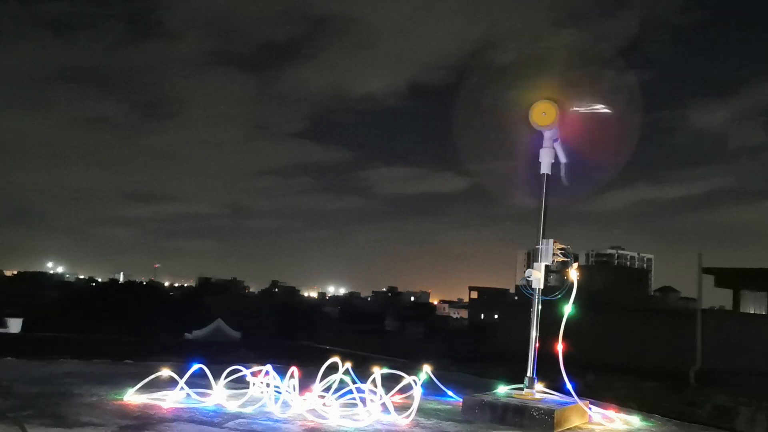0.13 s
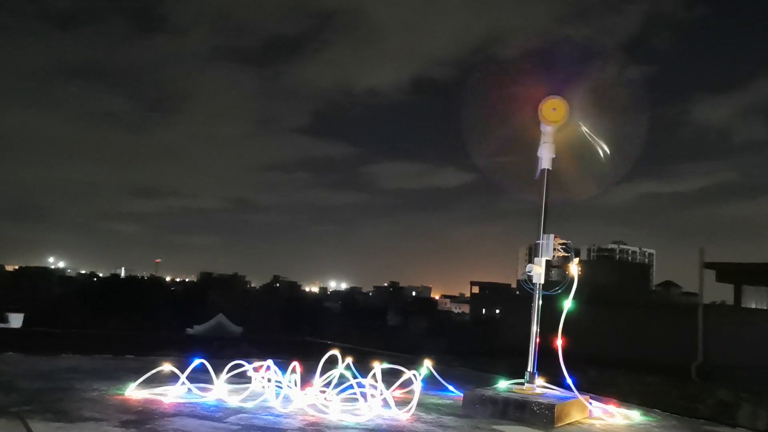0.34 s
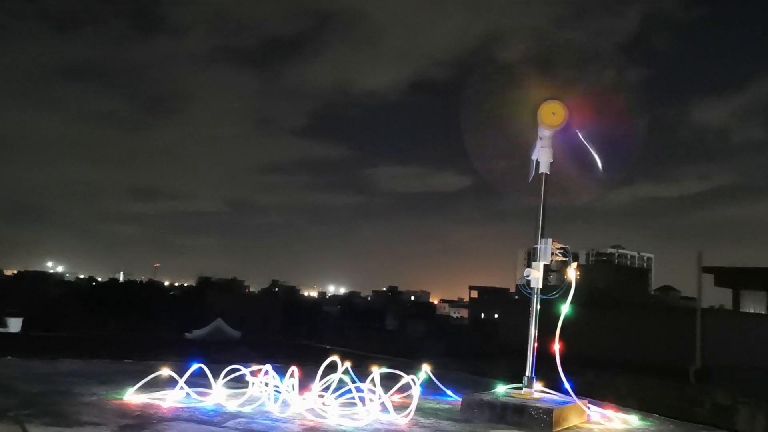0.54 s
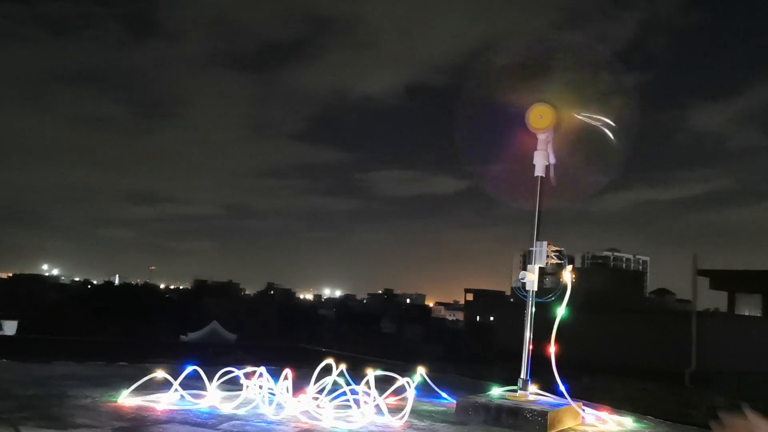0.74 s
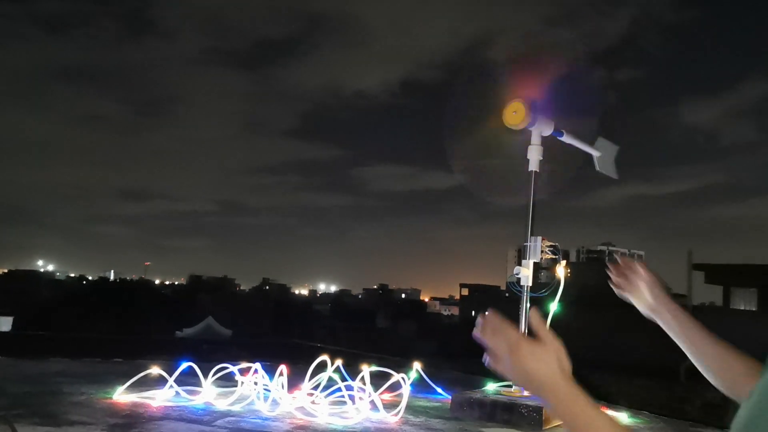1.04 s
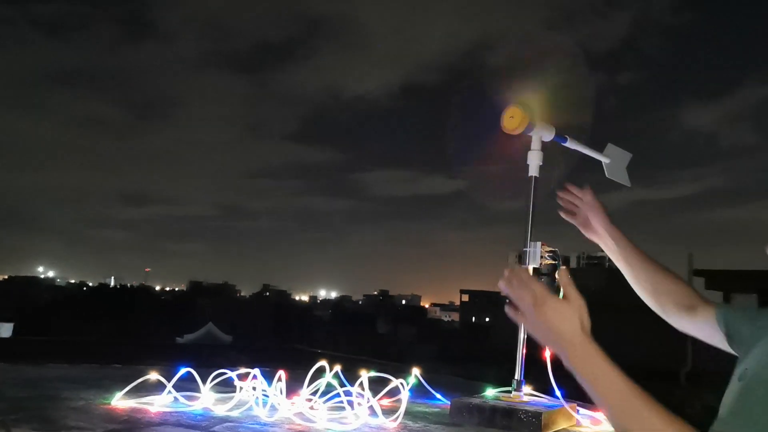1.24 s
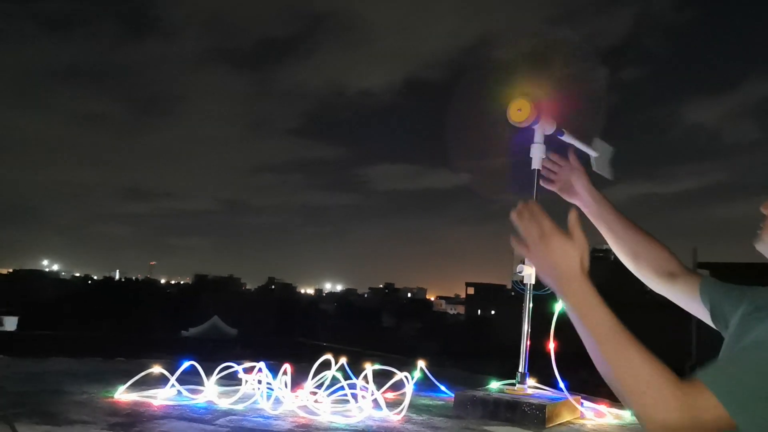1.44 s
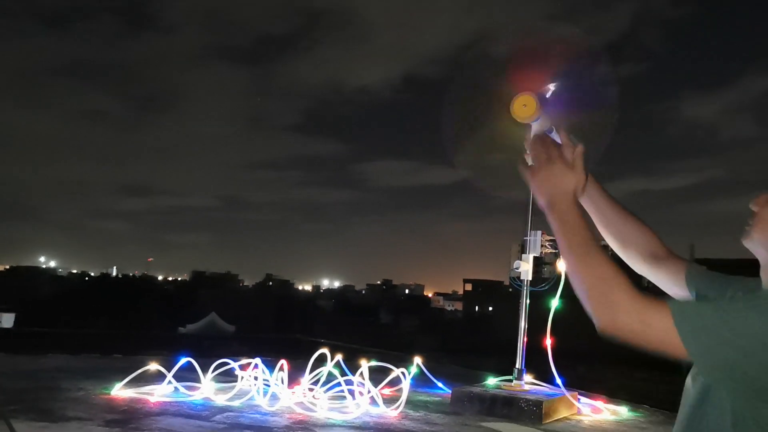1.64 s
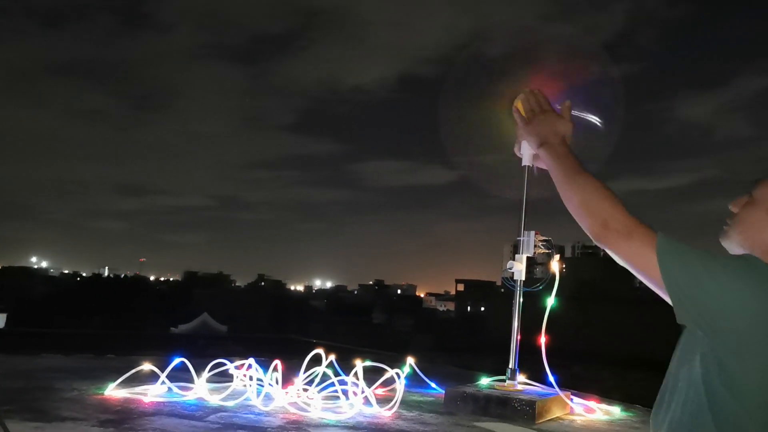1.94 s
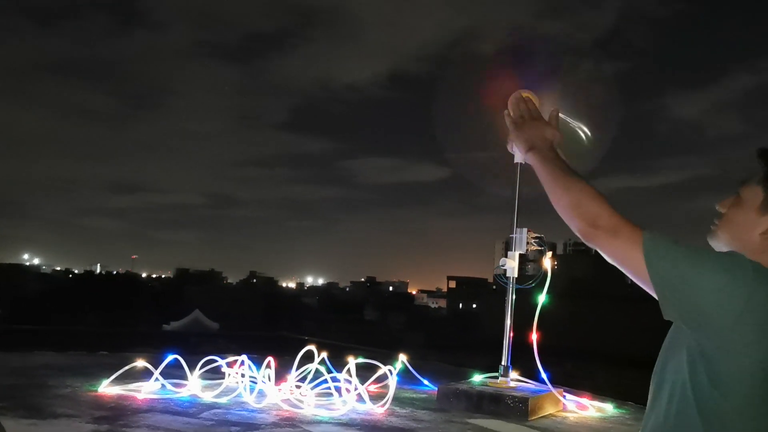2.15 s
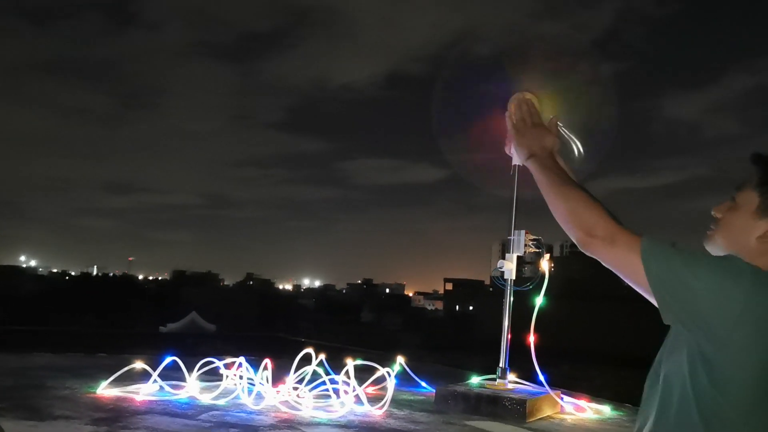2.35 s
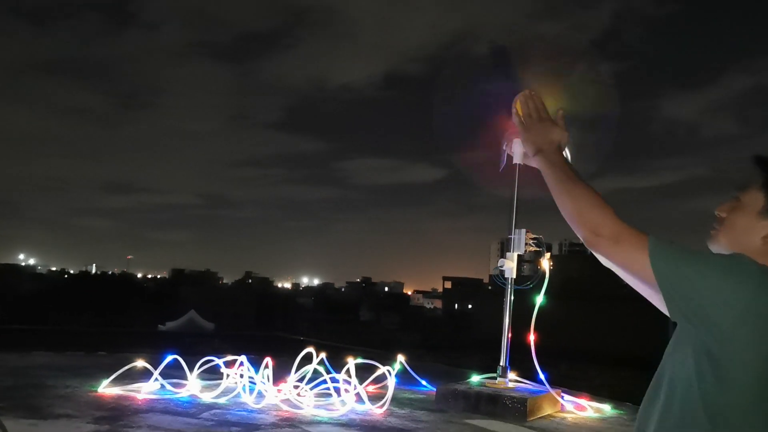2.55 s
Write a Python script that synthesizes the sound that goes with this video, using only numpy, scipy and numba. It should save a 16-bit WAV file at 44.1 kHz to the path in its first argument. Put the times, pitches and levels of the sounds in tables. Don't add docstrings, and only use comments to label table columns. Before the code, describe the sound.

Wind noise rumbles and slaps the microphone throughout, strongest in the middle, over airy city hiss and a faint blade whir; a few tiny ticks, then dull and brighter high metallic clinks, soon damped.

```python
import sys
import numpy as np
from scipy import signal
from scipy.fft import rfft, irfft
from scipy.io import wavfile
from scipy.ndimage import uniform_filter1d
from numba import njit

SR = 44100
rng = np.random.default_rng(int(sys.argv[2]) if len(sys.argv) > 2 else 0)


def persist_wave(psi):
    counts = np.round(np.clip(psi, -1, 1) * 32767).astype(np.int16)
    wavfile.write(sys.argv[1], SR, np.atleast_2d(counts).T)


def volts(x):
    e = np.asarray(x, float) / 20
    return 10 ** e


N = 119070

# [t/s, length/s, level/dB]
LEFT_THUMPS = [(0.315, 0.08, -18.5), (0.59, 0.013, -15), (0.689, 0.064, -14.5), (0.779, 0.014, -14),
               (0.913, 0.0079, -12), (1.2, 0.033, -19.5), (1.304, 0.017, -22), (1.381, 0.017, -36),
               (1.521, 0.03, -45), (1.78, 0.035, -16.5), (1.943, 0.069, -23), (2.018, 0.014, -16),
               (2.082, 0.12, -21.5), (2.192, 0.0099, -26), (2.312, 0.027, -18)]
RIGHT_THUMPS = [(0.415, 0.042, -22), (0.542, 0.046, -30), (0.643, 0.021, -16.5), (0.829, 0.015, -14),
                (0.931, 0.031, -36), (1.1, 0.018, -26), (1.328, 0.034, -19), (1.401, 0.022, -16),
                (1.688, 0.033, -24.5), (1.877, 0.033, -11), (1.958, 0.024, -17.5), (2.034, 0.021, -37),
                (2.21, 0.091, -24), (2.332, 0.028, -27.5)]
# [t/s, length/s, level/dB]
LEFT_FLUTTERS = [(0.292, 0.049, -34), (0.36, 0.02, -22.5), (0.591, 0.0086, -18), (0.647, 0.03, -24),
                 (0.685, 0.021, -48), (0.73, 0.017, -25.5), (0.924, 0.017, -40), (0.97, 0.02, -26),
                 (1.085, 0.014, -24), (1.199, 0.03, -21), (1.524, 0.03, -23.5), (1.785, 0.027, -19.5),
                 (1.83, 0.025, -22.5), (1.854, 0.024, -25), (1.938, 0.044, -25), (2.026, 0.015, -23.5),
                 (2.059, 0.023, -21)]
RIGHT_FLUTTERS = [(0.212, 0.042, -28.5), (0.301, 0.012, -21.5), (0.36, 0.045, -27), (0.473, 0.023, -26.5),
                  (0.642, 0.0047, -28), (0.706, 0.029, -21), (0.767, 0.0064, -24.5), (0.943, 0.054, -22.5),
                  (1.033, 0.054, -26), (1.098, 0.037, -21.5), (1.125, 0.043, -23), (1.186, 0.023, -18.5),
                  (1.224, 0.019, -17), (1.343, 0.04, -25), (1.458, 0.024, -25), (1.51, 0.044, -26),
                  (1.537, 0.012, -15.5), (1.575, 0.0079, -20.5), (1.625, 0.051, -24), (1.809, 0.026, -19),
                  (1.838, 0.011, -23), (1.896, 0.042, -23.5), (1.968, 0.0096, -21), (2.07, 0.047, -53),
                  (2.198, 0.012, -28), (2.303, 0.018, -30), (2.41, 0.03, -35), (.41, 0.042, -29.5),
                  (2.039, 0.025, -29)]
# [t/s, strength/dB]
BREEZE = [
    (.2, -0.5),
    (1.0, 7.5),
    (1.7, 3.5),
    (2.0, 0.5),
    (2.3, -0.5),
    (2.45, -3),
    (2.7, -13.5),
]
# [thump floor/dB, thump top f/Hz, flutter floor/dB, flutter top f/Hz at -20 dB,
# rise of that top/octaves per 10 dB, lean of the pressure/ratio]
PORTS = [
    (-32, 72, -41.5, 179.5, -0.53, 0.085),
    (-31.5, 85.7, -38, 574, 0.86, -0.061),
]
# [t/s, peak level/dB, half width/ms]
SLAPS = [(.297, -22, 0.46), (.3595, -13.5, 0.49), (.4725, -22.5, 0.39), (.646, -17, 0.48),
         (0.7084, -17.5, 0.52), (0.7214, -16.5, 0.48), (0.7666, -21.5, 0.34), (0.9382, -11, 0.94),
         (.9453, -12.5, 0.52), (.959, -18, 0.75), (1.003, -11.5, 0.56), (1.0299, -16.5, 0.45),
         (1.0905, -19, 0.37), (1.1016, -14, 0.47), (1.1218, -8, 0.39), (1.1316, -11, 0.43),
         (1.1714, -21, 0.56), (1.192, -14, 0.31), (1.1992, -4.5, 0.69), (1.2165, -6, 0.64),
         (1.2213, -8, 0.62), (1.23, -16.5, 0.25), (1.2381, -9.5, 0.45), (1.3297, -12, 0.67),
         (1.3486, -10, 0.68), (1.4, -14.5, 1.1), (1.48, -17.5, 0.47), (1.4935, -11, 0.93),
         (1.517, -10, 1.1), (1.5381, -4, 0.45), (1.5554, -14.5, .5), (1.5689, -6.5, 0.56), (1.6, -19, 0.56),
         (1.618, -9.5, 0.57), (1.8105, -14, 0.56), (1.838, -7, 1.1), (1.9147, -14.5, 0.61),
         (2.198, -18.5, 0.55)]
HELD_PITCHES = [4148, 6078, 6480, 8480, 11210, 11400, 14258, 14548]
FREE_PITCHES = [2573, 4146, 4205, 6072, 6233, 8477, 8610, 10361, 11208, 11373, 11650, 12850, 14455, 14700]
# [level/dB, time to fall 60 dB/s, left over right/dB, sway of that/dB, t facing left/s]
HELD_MODES = [(0., .1, 2, 3., 1.55), (-6, .13, -2, 3., 1.55), (-2, .1, 5, 3., 1.55),
              (-7, .11, -11, 4., 1.5), (-5, .07, -14, 3., 1.55), (-1, .06, -14, 3., 1.55),
              (-3, .07, 4, 3., 1.5), (-1, .11, -4, 8., 1.5)]
FREE_MODES = [(-6, .8, -7, 3., 1.8), (-10, .9, -6, 5., 1.8), (-5, .9, -6, 5., 1.8), (-8, .4, 6, 8., 1.72),
              (2, .7, 4, 12, 1.72), (-15, .78, -9, 3., 1.7), (-9.5, .5, -11, 3., 1.7),
              (-32, .8, -6, 10., 1.82), (-9, .1, -2, 4., 1.7), (-11, .6, -8, 8., 1.7),
              (-3, .03, -5, 3., 1.7), (-32, .7, -2, 10., 1.82), (2, .17, -3, 7., 1.74),
              (-1, .05, 3, 3., 1.74)]
# [t/s, level/dB, favoured f/Hz, loss away from it/dB per octave squared, crack level/dB]
HELD_CLINKS = [
    (1.518, -34, 7500, 3., -39),
    (1.5245, -36, 11000, 6., -38),
    (1.5635, -45, 5500, 5., -38),
]
FREE_CLINKS = [
    (1.653, -37, 8000, 2., -36),
    (1.6648, -29, 6260, 25, -46),
    (1.7392, -28, 13400, 7., -31),
    (1.777, -40, 5200, 6., -43),
]
# [t/s, level/dB]
TICKS = [
    (1.117, -33.5),
    (1.1237, -33.5),
    (1.1255, -33),
    (1.499, -39),
    (1.576, -35),
]
# [t/s, left level/dB, right level/dB, f/Hz]
WHIR = [
    (.2, -55, -54, 2030),
    (.65, -51.5, -50.5, 2300),
    (.9, -45, -51, 2260),
    (1.1, -62, -50, 2280),
    (1.9, -60.5, -51, 2160),
    (2.33, -48.5, -46, 2170),
    (2.7, -73, -53.5, 1970),
]
# [t/s, left level/dB, right level/dB, brightness/dB per octave]
HISS = [(.2, 42, 41.5, 0), (.3, 41, 41, 0.6), (.6, 38, 37.5, 0.94), (.93, 39, 40, 0.2),
        (1.05, 36, 36.5, -.1), (1.25, 32.5, 38, -0.3), (1.6, 32, 38.5, 1.3), (2.1, 36, 41, -0.57),
        (2.3, 38.5, 42, -1), (2.5, 37.5, 35.5, -.5), (2.7, 34.5, 36.5, -1)]
# [f/Hz, level/dB per Hz]
LEFT_COLOUR = [(300, -78.5), (1300, -79), (3500, -86), (6500, -87), (7800, -108), (12500, -101),
               (13800, -104), (15500, -116)]
RIGHT_COLOUR = [(750, -71), (1800, -80.5), (3700, -90.5), (5200, -83.5), (7900, -94), (10500, -86.5),
                (13300, -89.5), (14300, -95)]


def buffet(thumps, flutters, port):
    thump_floor_db, thump_top_hz, flutter_floor_db, flutter_top_hz, rise, lean = port
    white = rng.standard_normal((2, N))

    slow = butter(butter(white[0], 20.9, "high"), thump_top_hz, "low", order=3)
    raw_share = 0.31
    thump = (1 - raw_share) * evened(slow) + raw_share * rms_one(slow)

    level_db = wind_db(flutters, flutter_floor_db)
    lumps_db = 4.0 * drift(65)
    top_hz = flutter_top_hz * 2 ** (rise * (level_db + 0.8 * lumps_db + 20.0) / 10)
    top_hz = np.clip(top_hz, 60, 2500)
    eddies = butter(butter(white[1], 92, "high"), 237, "low", order=1)
    flutter = evened(volts(lumps_db) * gliding(eddies, top_hz, 1.173, SR, False))

    body_hz = 0.22 * flutter_top_hz
    body = evened(butter(rng.standard_normal(N), [body_hz, 2 * body_hz], "band"))
    flutter = flutter + volts(-2.5 + 0.5 * lumps_db) * body

    thump_gain = volts(wind_db(thumps, thump_floor_db))
    push = thump_gain * thump + volts(level_db) * flutter
    strength = np.sqrt(thump_gain ** 2 + volts(2 * level_db))
    return butter(push + lean * push ** 2 / strength, 9.9, "high")


def wind_db(puffs, floor_db):
    t = np.arange(0, N, 16) / SR
    power = volts(2 * (floor_db + in_time(BREEZE)[0][::16]))
    for s, length_s, db in puffs:
        bell = np.exp(-4 * np.log(2) * np.abs((t - s) / length_s) ** 2.04)
        power = power + volts(2 * db) * bell
    return np.interp(np.arange(N) / SR, t, 10 * np.log10(power))


def slaps():
    out, near = np.zeros(N), np.arange(-250, 251)
    for s, db, width_ms in SLAPS:
        u = near / SR / (width_ms * 1e-3)
        out[int(s * SR) + near] -= volts(db) * u * np.exp(0.5 - u ** 2 / 2)
    return out


def clinks(hits, pitches, modes):
    turn_s, swing_db, swing_per_s, swing_turns = 0.28, 2.0, 18, 0.06
    left_lag_s = 46e-6
    catch_s, catch_t60_s = 1.89, 0.25
    out, clock = np.zeros((2, N)), np.arange(int(1.5 * SR), int(2.1 * SR))
    now = clock / SR
    for hz, (mode_db, t60, lean_db, sway_db, facing_s) in zip(pitches, modes):
        pan_db = lean_db + sway_db * np.cos(2 * np.pi * (now - facing_s) / turn_s)
        waver_db = swing_db * np.array([drift(swing_per_s)[clock], drift(swing_per_s)[clock]])
        lag = hz * left_lag_s * np.array([[1], [0]])
        sway = swing_turns * drift(swing_per_s)[clock] * [[1], [-1]]
        phase = rng.random() - lag + sway
        for s, db, favoured_hz, favour_db, _ in hits:
            t = np.maximum(now - s, 0)
            fall_db = -60 * t / t60 - 60 * np.maximum(now - catch_s, 0) / catch_t60_s
            gain_db = db + mode_db - favour_db * np.log2(hz / favoured_hz) ** 2
            gain_db = gain_db + pan_db * np.array([[0.5], [-0.5]])
            onset = 1 - np.exp(-t / 0.0004)
            tone = np.sin(2 * np.pi * (hz * t + phase))
            out[:, clock] += volts(gain_db + fall_db + waver_db) * onset * tone
    return out


def ticks():
    loose = butter(sum(snap(s, db) for s, db in TICKS), 1780, "high")
    cracks = sum(snap(s, crack_db) for s, *_, crack_db in HELD_CLINKS + FREE_CLINKS)
    coloured = through_ports(loose) * volts(88) + through_ports(butter(cracks, 4000, "high")) * volts(91)
    sparkle = butter(cracks, [9800, 15300], "band") * volts(np.array([[-4.0], [-1.0]]))
    return coloured + sparkle


def snap(s, db):
    t = np.arange(N) / SR - s
    fade = np.where(t > 0, np.exp(-np.abs(t) / 0.0046), 0)
    return fade * rng.standard_normal((2, N)) * volts(db)


def whir():
    left_db, right_db, hz = in_time(WHIR)
    width_hz = 780
    white = rng.standard_normal((3, N))
    bands = []
    for k in range(2):
        air = white[k] + 0.5 * white[2]
        bands.append(gliding(air, hz, width_hz / hz.mean(), SR, True))
    return rms_one(np.array(bands)) * volts(np.array([left_db, right_db]) + 2.6 * drift(4.7))


def hiss():
    left_db, right_db, bright = in_time(HISS)
    out, edges, together_db = 0, np.geomspace(180, 16000, 21), 0.64 * drift(5)
    white = rng.standard_normal((2, 2, N))
    for k, (low, high) in enumerate(zip(edges, edges[1:])):
        mid, side = butter(white[k % 2], [low, high], "band")
        hz = np.sqrt(low * high)
        alike = np.clip(0.59 / (1 + (hz / 1100) ** 2), 0, 1)
        level_db = np.array([left_db, right_db]) + bright * np.log2(hz / 2000)
        gain = volts(level_db + together_db + 1.47 * drift(20))
        out = out + gain * (np.sqrt(1 + alike) * mid + np.sqrt(1 - alike) * side * [[1], [-1]])
    return through_ports(out)


def through_ports(x):
    log_hz = np.log(np.arange(N // 2 + 1) * SR / N + 1)
    colour_db = []
    for table in (LEFT_COLOUR, RIGHT_COLOUR):
        hz, db = np.transpose(table)
        colour_db.append(np.interp(log_hz, np.log(hz), db))
    return irfft(rfft(x) * volts(np.array(colour_db)), N)


def rms_one(x):
    return x / np.sqrt(np.mean(x ** 2, axis=-1, keepdims=True) + 1e-20)


def in_time(rows):
    s, *columns = np.transpose(rows)
    return [np.interp(np.arange(N) / SR, s, c) for c in columns]


def butter(x, hz, kind, order=2):
    return signal.sosfilt(signal.butter(order, hz, kind, fs=SR, output="sos"), x)


def drift(rate):
    r = np.exp(-40 * np.pi * rate / SR)
    slow = signal.lfilter([1], [1, -2 * r, r * r], rng.standard_normal(N // 20 + 2002))[2000:]
    return np.interp(np.arange(N) / 20, np.arange(len(slow)), rms_one(slow))


def evened(x):
    size = int(0.031 * SR)
    power = uniform_filter1d(uniform_filter1d(x ** 2, size=size), size=size)
    return x / np.sqrt(power + 1e-3 * np.mean(x ** 2))


@njit
def gliding(x, hz, damping, rate, band):
    y = x.copy()
    for stage in range(2):
        low, mid = 0.0, 0.0
        for i in range(len(y)):
            f = 2 * np.sin(np.pi * hz[i] / rate)
            low += f * mid
            mid += f * (y[i] - low - damping * mid)
            y[i] = mid if band else low
    return y


def scene():
    left_wind = buffet(LEFT_THUMPS, LEFT_FLUTTERS, PORTS[0])
    right_wind = buffet(RIGHT_THUMPS, RIGHT_FLUTTERS, PORTS[1]) + slaps()
    held_ring = clinks(HELD_CLINKS, HELD_PITCHES, HELD_MODES)
    free_ring = clinks(FREE_CLINKS, FREE_PITCHES, FREE_MODES)
    return np.array([left_wind, right_wind]) + held_ring + free_ring + ticks() + whir() + hiss()


def low_pass(x):
    return signal.sosfilt(signal.butter(12, 16310, fs=SR, output="sos"), x)


def record(dry):
    opening = np.clip((np.arange(N) / SR - 0.2015) / 0.001, 0, 1)
    top_cut = signal.cheby2(12, 60, 16300, fs=SR, output="sos")
    return low_pass(signal.sosfilt(top_cut, dry) * opening)


dry = scene()
out = record(dry)
persist_wave(out)
```